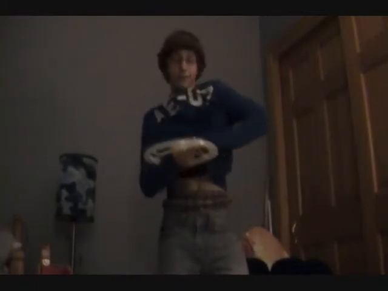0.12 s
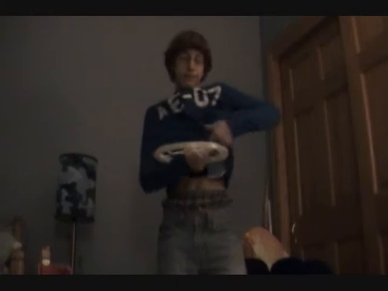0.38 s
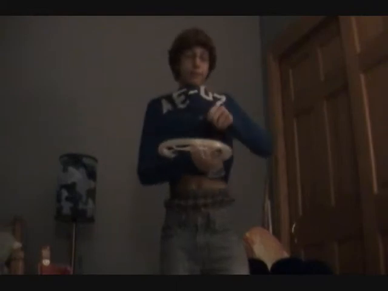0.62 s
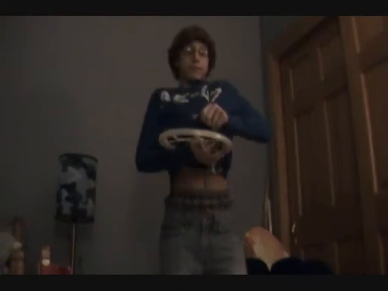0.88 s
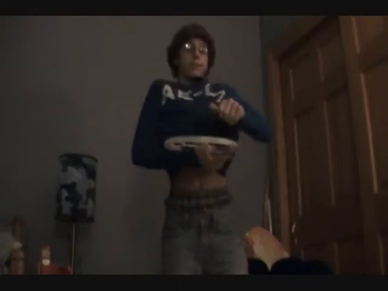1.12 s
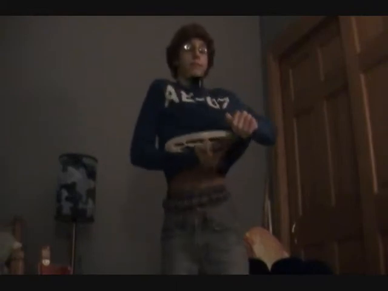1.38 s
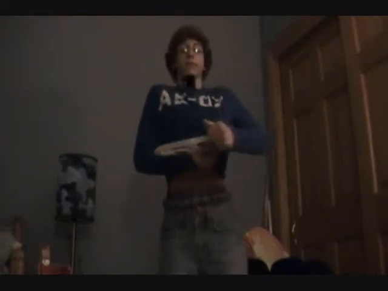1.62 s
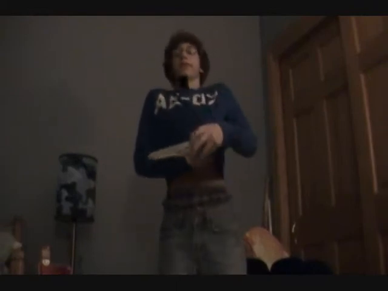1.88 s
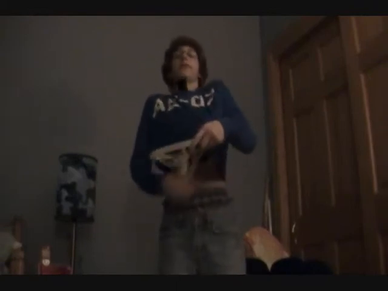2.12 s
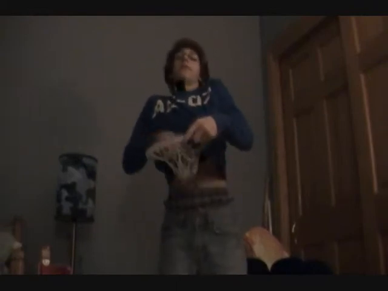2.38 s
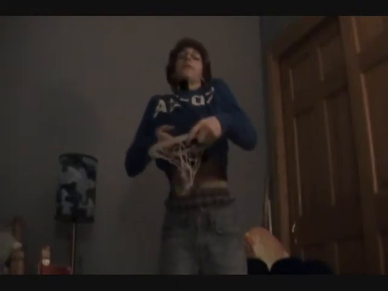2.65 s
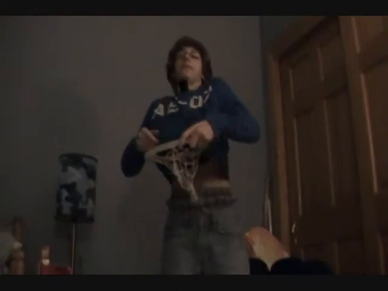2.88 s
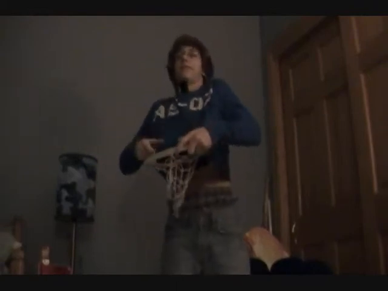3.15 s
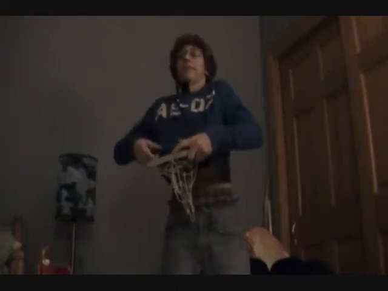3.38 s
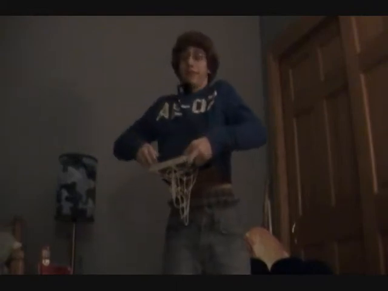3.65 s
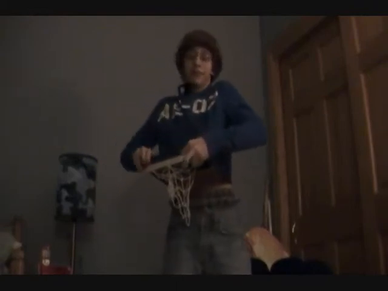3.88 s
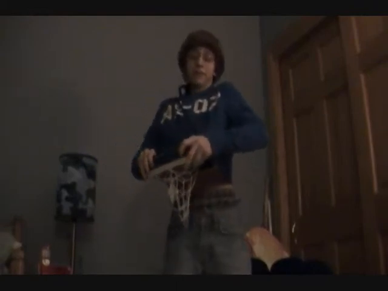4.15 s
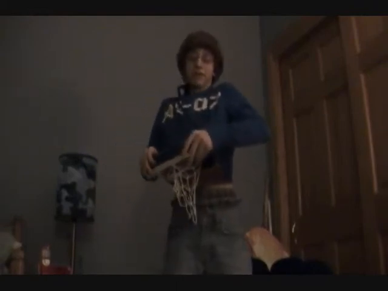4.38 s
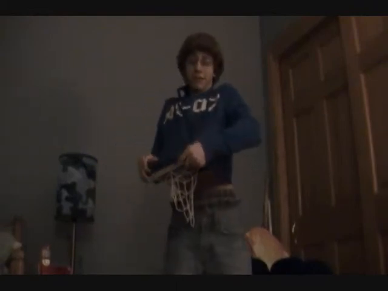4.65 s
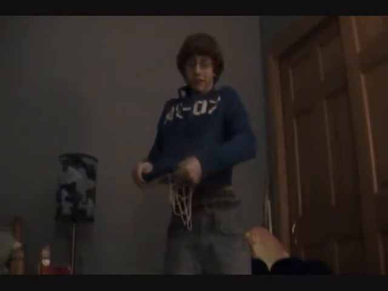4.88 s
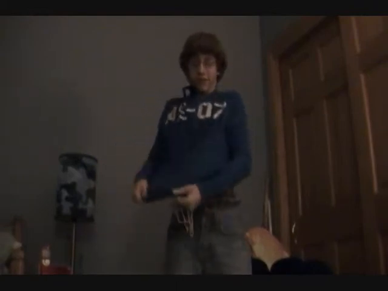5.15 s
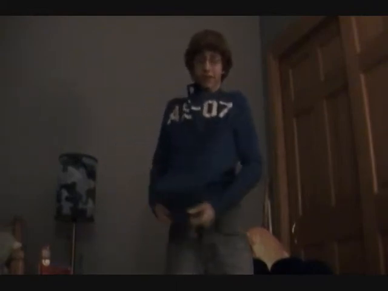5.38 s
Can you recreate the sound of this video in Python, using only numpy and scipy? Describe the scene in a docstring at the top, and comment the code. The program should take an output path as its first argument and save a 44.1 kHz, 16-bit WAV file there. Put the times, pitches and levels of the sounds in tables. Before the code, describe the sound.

In a small quiet bedroom, a sweater rustles continuously as a plastic hoop with a string net is handled beneath it. Early on come brushes and two short rubbing squeaks, then light ticks, a sharp plastic snap at about 3.5 seconds, soft low bumps, and a stronger cloth rustle near the end. Microphone a few steps away, with soft hiss.

```python
"""Toy hoop drawn from under a sweater

In a quiet, small bedroom a plastic hoop with a string net is pulled out from under knitted cloth.
Cloth friction is filtered random grains, skin on the hoop a stick-slip tone; knocks, brushes and ticks
are decaying resonances, and one catch snaps sharply. Direct sound, two echoes and a diffuse tail form the room.
Beneath lie shaped-noise hiss and murmur, a weak mains hum and, early on, a faint insect-like trill."""
import sys
import numpy as np
from scipy import signal
from scipy.fft import rfft, irfft, next_fast_len
from scipy.io import wavfile
from scipy.ndimage import uniform_filter1d

SR = 44100
rng = np.random.default_rng(int(sys.argv[2]) if len(sys.argv) > 2 else 0)


def log_audio(samples):
    """Write samples as a 16-bit WAV file to the path given in sys.argv[1]."""
    # one column per channel
    frames = np.atleast_2d(samples).T
    # limit to full scale, then quantise
    limited = np.clip(frames, -1, 1)
    pcm = np.round(limited * 32767).astype(np.int16)
    wavfile.write(sys.argv[1], SR, pcm)


def undo_db(level):
    """Turn decibels back into plain size, where 20 dB means ten times bigger."""
    steps = np.asarray(level, float) / 20
    return 10 ** steps


N = 243469
T = np.arange(N) / SR  # time of every sample, s


def colour(x, points, share=0.9):
    """Zero-phase filtering: the spectrum is scaled by `share` of the dB drawn through (Hz, dB) points."""
    size = next_fast_len(x.shape[-1])
    hz, db = np.transpose(points)
    f = np.maximum(np.arange(size // 2 + 1) * SR / size, 1)
    gain_db = share * np.interp(np.log(f), np.log(hz), db)
    return irfft(rfft(x, size) * undo_db(gain_db), size)[..., :x.shape[-1]]


def unit(x):
    """Normalisation: scale to an rms of 1."""
    return x / np.sqrt(np.mean(x ** 2))


def walk(rate):
    """Slow random modulation: levels held 1 / rate s and smoothed twice, with a spread near 1."""
    hold = int(SR / rate)
    steps = np.repeat(rng.standard_normal(N // hold + 1), hold)
    return 1.2 * uniform_filter1d(uniform_filter1d(steps, hold), hold)[:N]


def grit(per_s, spread_db):
    """Granular friction: tiny slips at random moments, a few much larger, in two unrelated streams."""
    size = np.minimum(rng.exponential(size=(2, N)), 5)
    slips = rng.random((2, N)) < per_s / SR
    return slips * rng.standard_normal((2, N)) * undo_db(spread_db * size)


def resonate(x, hz, width):
    """Two-pole resonance: a single mode of given centre and bandwidth."""
    b, a = signal.iirpeak(min(hz, .45 * SR), hz / width, fs=SR)
    return signal.lfilter(b, a, x)


def swell(t, rise, t60):
    """Attack and damping: a short rise, then an even decay in dB that falls 60 dB in t60 s."""
    return np.minimum(t / rise, 1) ** 2 * 1000 ** (-np.maximum(t - rise, 0) / t60)


def add(out, s, x):
    """Superposition: mix x into out from time s."""
    i = int(s * SR)
    out[..., i:i + x.shape[-1]] += x[..., :N - i]


# How hard the cloth rubs: start_s [s], level_db [dB rms of the fibre hiss, before variation and mixing]
RUBBING = [(0.0, -42.5), (.09, -53), (.2, -45.5), (.38, -41), (.47, -48), (.53, -48.5), (.61, -50.5),
           (.66, -44), (.83, -40.5), (.92, -43), (.98, -37), (1.08, -39), (1.14, -40.5), (1.19, -41),
           (1.3, -40), (1.5, -43.5), (1.66, -44.5), (1.78, -50), (1.9, -44.5), (1.98, -53), (2.022, -40),
           (2.055, -44.5), (2.165, -44), (2.2, -43.5), (2.27, -44), (2.34, -56), (2.41, -45.5), (2.55, -60),
           (2.68, -49.5), (2.74, -46), (2.83, -47), (2.95, -41.5), (3.1, -45), (3.27, -59.5), (3.35, -44.5),
           (3.46, -49.5), (3.72, -53), (3.77, -44), (3.83, -54), (3.98, -44), (4.24, -44), (4.33, -47.5),
           (4.5, -49.5), (4.7, -42.5), (4.8, -44), (4.9, -48), (5.0, -46), (5.04, -40.5), (5.12, -44.5),
           (5.22, -44), (5.31, -37), (5.36, -37.5), (5.43, -38.5), (5.47, -38.5), (5.52, -45.5)]
# How loose the cloth hangs: start_s [s], fold_db [dB rms], flap_db [dB rms], both at usual rubbing
SLACKNESS = [(0.0, -37.5, -45), (.25, -45, -48), (.5, -45.5, -59), (.85, -44, -53), (1.0, -41, -51),
             (1.15, -46, -59), (1.4, -44, -54.5), (1.7, -48, -51), (2.05, -46, -55), (2.4, -48.5, -57),
             (2.75, -46.5, -51), (3.1, -52, -49.5), (3.4, -43.5, -49.5), (3.8, -52, -47.5),
             (4.0, -54, -42.5), (4.2, -46, -59.5), (4.4, -50, -49), (4.7, -50.5, -59), (5.1, -46.5, -50.5),
             (5.52, -49.5, -46.5)]
# Spectra of the three layers: frequency_hz [Hz], level_db [relative dB per Hz, 0.9 of it applied]
FIBRE_SPECTRUM = [(1180, -18.5), (2000, -2), (2640, -3), (4790, -0.5), (6050, -1.5), (8580, -3),
                  (10600, -7.5), (11400, -21), (14800, -63), (22000, -120)]
FOLD_SPECTRUM = [(250, -16), (500, 5.5), (900, 6), (1500, 4.5), (2200, 3), (3500, -8.5)]
FLAP_SPECTRUM = [(25, -4.5), (45, -4.5), (100, -1.5), (200, 0), (400, 0.5), (700, -16.5)]
USUAL_RUBBING_DB = -45
FOLD_FOLLOW, FLAP_FOLLOW = 0.84, 0.93  # dB of swish and flap per dB of rubbing


def cloth():
    """Granular friction: fibres slip in dense grains, folds swish lower and patchier, loose cloth flaps the air."""
    hiss_db = np.interp(T, *np.transpose(RUBBING))
    s, *columns = np.transpose(SLACKNESS)
    fold_db, flap_db = (np.interp(T, s, column) for column in columns)
    harder_db = hiss_db - USUAL_RUBBING_DB
    # the grip varies for all layers at once
    grip_db = .9 * walk(30)
    hiss_db = hiss_db + 1.2 * walk(45)
    fold_db = fold_db + FOLD_FOLLOW * harder_db + 1.73 * walk(20)
    flap_db = flap_db + FLAP_FOLLOW * harder_db + 1.63 * walk(10)
    fibres = unit(colour(grit(15000, 0.56), FIBRE_SPECTRUM)) * undo_db(hiss_db)
    folds = unit(colour(grit(5000, 1.8), FOLD_SPECTRUM)) * undo_db(fold_db)
    flaps = unit(colour(rng.standard_normal((2, N)), FLAP_SPECTRUM)) * undo_db(flap_db)
    return undo_db(grip_db) * (fibres + folds + flaps)


# Sudden brushes against a part, and at 3.475 s the bright wash that follows the snap: start_s [s], # level_db
# [dB rms before decay and mixing], pitch_hz [Hz], width_hz [Hz, nominal: each of two resonances is 1.2 times as
# wide], t60_s [s]
BRUSH_EVENTS = [(.002, -34.5, 1130, 600, 0.19), (.125, -36, 2500, 900, 0.031),
                (0.163, -36.5, 725, 700, 0.4), (0.179, -38, 2170, 1200, 0.21), (.2, -41, 894, 500, 0.39),
                (.291, -33, 990, 900, 0.13), (.512, -43, 1870, 2000, 0.21), (.733, -31.5, 1030, 300, 0.05),
                (.93, -39, 2700, 1500, 0.054), (.985, -38, 1190, 1400, .25),
                (1.146, -30.5, 2100, 1210, .07), (1.582, -34.5, 4400, 5000, 0.075),
                (1.632, -38, 1230, 700, 0.1), (2.016, -35, 1870, 1300, 0.081),
                (2.155, -39, 1600, 1800, 0.17), (2.705, -34, 5600, 6300, 0.42),
                (2.728, -43, 2340, 200, .12), (2.865, -38.5, 5070, 6000, 0.11),
                (2.95, -40, 2500, 1500, 0.17), (3.062, -42.5, 870, 348, .19), (3.103, -41, 590, 600, 0.1),
                (3.348, -34.5, 900, 1300, 0.093), (3.36, -46.5, 680, 900, 1),
                (3.475, -30, 5200, 5000, 0.28), (3.545, -40, 1700, 900, 0.072),
                (3.756, -43, 586, 900, 0.15), (3.81, -42.5, 227, 298, 0.24), (3.966, -44, 384, 700, 0.36),
                (4.311, -42.5, 1870, 600, 0.2), (4.378, -37, 2500, 6000, 0.11), (4.38, -41, 398, 800, 0.17),
                (5.03, -36.5, 590, 700, 0.19), (5.07, -34, 1710, 250, 0.064), (5.098, -42, 1620, 250, 0.45),
                (5.134, -27.5, 3240, 5550, .23), (5.157, -29, 1650, 1300, 0.14),
                (5.16, -34.5, 700, 900, 0.19), (5.293, -45, 503, 700, 0.11),
                (5.369, -25.5, 4300, 5900, 0.12), (5.377, -24.5, 1680, 1410, 0.15),
                (5.467, -32.5, 1620, 700, 0.13)]
# Slow slides on a narrow ring, the lowest a mere rumble of the body:
# start_s [s], level_db [dB rms before decay and mixing], pitch_hz [Hz], t60_s [s]
SLIDE_EVENTS = [(0.371, -31.5, 9100, 0.14), (.53, -47, 2240, .2), (.96, -37.5, 990, 0.43),
                (.97, -45, 80, 0.82), (1.165, -42.5, 1970, .83), (1.3, -45, 1870, 1), (1.28, -40, 960, 0.3),
                (1.67, -44.5, 770, 0.33), (2.75, -46.5, 920, 1), (2.97, -46, 990, 0.74),
                (3.8, -51, 300, 0.24), (3.85, -45, 59.7, 0.29), (3.969, -46, 60, 0.24),
                (3.891, -46, 6200, 0.99), (3.9, -48.5, 1880, 0.61), (4.031, -48.5, 1590, .4),
                (4.419, -54, 50, 0.44), (4.74, -44.5, 1880, 0.4), (4.938, -48, 1674, 0.15),
                (5.15, -35.5, 1750, 0.16), (5.375, -33, 1810, 0.36)]
BRUSH_RISE_S, SLIDE_RISE_S = .0045, 0.02
SLIDE_WIDTH_HZ, SLIDE_WIDTH_SHARE = 49, 0.22  # nominal width: a base plus a share of the pitch


def brushes():
    """Forced resonance: gritty scrapes, sudden or sliding, each ring the part that is touched; one bright wash
    follows the snap."""
    out, t = np.zeros((2, N)), np.arange(SR // 2) / SR
    sudden = [(*row, BRUSH_RISE_S) for row in BRUSH_EVENTS]
    slow = [(s, db, hz, SLIDE_WIDTH_HZ + SLIDE_WIDTH_SHARE * hz, t60, SLIDE_RISE_S)
            for s, db, hz, t60 in SLIDE_EVENTS]
    for s, db, hz, width, t60, rise in sudden + slow:
        scrape = rng.standard_normal((2, len(t))) * undo_db(1.73 * rng.exponential(size=len(t)))
        ring = resonate(resonate(scrape, hz, 1.2 * width), hz, 1.2 * width)
        add(out, s, undo_db(db) * unit(ring) * swell(t, rise, t60))
    return out


# Skin dragging on the hoop, one list per stroke: start_s [s], pitch_hz [Hz], level_db [dB, near rms]
DRAG_STROKES = [
    [(0.66, 827, -60), (0.73, 832.5, -46.5), (0.914, 809, -59), (0.938, 815, -41.5), (0.994, 820, -50),
     (1.012, 848, -50), (1.054, 883, -56), (1.08, 850, -66.5)],
    [(1.24, 826, -50), (1.32, 856, -45), (1.358, 822, -45.5), (1.428, 799, -40), (1.492, 843, -66),
     (1.5, 831, -67.5)],
]


def drag():
    """Stick-slip: uneven friction excites one narrow hollow whose pitch moves with the grip."""
    out = np.zeros(N)
    for stroke in DRAG_STROKES:
        s, hz, db = np.transpose(stroke)
        wobble = unit(uniform_filter1d(rng.standard_normal((2, N)), int(0.012 * SR)))
        uneven = 0.87 + 0.76 * (wobble[0] + 1j * wobble[1])  # random strength and phase
        tone = np.exp(2j * np.pi * np.cumsum(np.interp(T, s, hz)) / SR)
        level_db = np.interp(T, s, db, left=-120, right=-120)
        out += np.real(uneven * tone) * undo_db(level_db)
    return out


# Soft knocks and cloth slaps on hollow parts: start_s [s], level_db [dB peak before rise and roughness],
# pitch_hz [Hz at the start], glide [octaves per s], t60_s [s]
KNOCK_EVENTS = [(.293, -29, 1087, 1, .047), (.733, -46, 1040, 14, 0.033), (1.26, -38, 520, 10, 0.031),
                (1.573, -37, 194, 0, 0.23), (2.169, -44, 90, 0.5, 0.26), (2.86, -37.5, 512, -5, 0.054),
                (3.348, -31, 670, -31, .012), (3.396, -38, 328, -9, 0.066), (3.756, -33.5, 495, -6.5, 0.14),
                (3.779, -39, 432, 4.5, 0.11), (3.805, -38, 326, -18.5, 0.15), (3.831, -35.5, 299, 2.5, .14),
                (3.871, -56, 152, -6, .2), (3.967, -36, 205, 9, 0.12), (4.056, -43, 110, 2, .17),
                (4.289, -46, 116, 6, 0.089), (4.381, -40, 255, -8, 0.052), (4.402, -37, 90, 2, 0.075),
                (5.035, -34, 290, 2, 0.028), (5.165, -29.5, 403, -5, 0.075), (5.469, -31.5, 355, 10, 0.095),
                (5.48, -35, 385, -1, 0.041), (5.505, -38, 380, -9, .1)]
KNOCK_RISE_S, KNOCK_RISE_CYCLES = 0.001, 1  # lower hollows take longer to speak
KNOCK_ROUGH = 0.43  # cloth in contact makes the ring uneven


def knocks():
    """Damped resonance: each knock rings one low hollow whose pitch may glide up or down."""
    out, t = np.zeros(N), np.arange(SR // 2) / SR
    for s, db, hz, glide, t60 in KNOCK_EVENTS:
        shape = swell(t, KNOCK_RISE_S + KNOCK_RISE_CYCLES / hz, t60)
        unevenness = unit(uniform_filter1d(rng.standard_normal(len(t)), int(SR / hz)))
        shape = shape * (1 + KNOCK_ROUGH * unevenness)
        cycles = np.cumsum(hz * 2 ** (glide * t)) / SR
        add(out, s, undo_db(db) * shape * np.sin(2 * np.pi * cycles))
    return out


# Hard ticks and the snap: start_s [s], level_db [dB peak before the band-pass in scene()], dullness [0-1]
TICK_EVENTS = [(0.2969, -17.5, 0.5), (0.5144, -28, 0.5), (0.7765, -29, 0), (1.0952, -27, .1),
               (1.1502, -36, .2), (1.26, -26, .1), (2.0178, -23, 1), (2.2584, -23, 0.29),
               (2.4160, -26, 0.2), (2.7006, -14, 0.44), (2.7076, -34, .1), (2.82, -22, 0),
               (3.352, -27, 0.6), (3.4695, -.6, 0), (3.4783, -4.5, 0), (3.547, -23, 0.87), (4.38, -23, 0.4),
               (5.3803, -7, .05)]
# Modes of the plastic: pitch_hz [Hz], level_db [relative dB before dulling and variation], t60_s [s]
PLASTIC_MODES = [(2100, -18.5, 0.02), (3740, -25, 0.0078), (4770, 1, 0.0083), (5720, 5.5, 0.0051),
                 (6980, 6, 0.0029), (7700, 2, 0.0054), (8300, -7, 0.013)]


def ticks():
    """Modal synthesis: each tick rings the plastic's short modes; a softer contact loses the upper ones."""
    out, t = np.zeros(N), np.arange(800) / SR
    for s, db, dull in TICK_EVENTS:
        # only ticks below -10 dB vary in timbre
        vary_db = 6.5 * rng.standard_normal(len(PLASTIC_MODES)) * (db < -10)
        ring = np.zeros(len(t))
        for (hz, mode_db, t60), vary in zip(PLASTIC_MODES, vary_db):
            dulling_db = 14.3 * dull * np.log2(hz / 3000)
            ring += undo_db(mode_db + vary - dulling_db) * np.sin(2 * np.pi * hz * t) * 1000 ** (-t / t60)
        add(out, s, undo_db(db) * ring / np.abs(ring).max())
    return out


# Unlikeness of the two microphone ports: frequency_hz [Hz], level_db [side minus mid dB, 0.9 of it applied]
PORT_SIDES = [(60, -10), (110, -19), (190, -9), (350, -13.5), (630, -13.5), (1140, -13), (2050, -9),
              (3690, -8.5), (6660, -7.5), (12000, -2.5)]


def ports(mid, other):
    """Partial coherence: left and right share a common part and take an unrelated part in opposite sign."""
    side = colour(other, PORT_SIDES)
    return np.array([mid + side, mid - side])


# Floor and far wall: delay_s [s], level_db [dB relative to the direct sound]
ROOM_ECHOES = [(.0058, -15), (.022, -22)]
# What the walls give back: frequency_hz [Hz], level_db [relative dB, 0.9 of it applied]
TAIL_SPECTRUM = [(300, -2.5), (1000, 1.5), (3000, 0.5), (7000, 1), (11000, -7)]
ROOM_T60_S = .26


def room(x, wet_db):
    """Impulse response: direct sound, two hard echoes and a diffuse tail that differs between the ports."""
    t = np.arange(int(.4 * SR)) / SR
    noise = colour(rng.standard_normal((2, len(t))), TAIL_SPECTRUM)
    common, other = noise * 1000 ** (-t / ROOM_T60_S) * np.minimum(t / 0.0087, 1)
    # wet_db is the energy of the common tail relative to the direct sound
    answer = undo_db(wet_db) * ports(common, undo_db(4) * other) / np.sqrt(np.sum(common ** 2))
    answer[:, 0] += 1
    for delay, db in ROOM_ECHOES:
        answer[:, int(delay * SR)] += undo_db(db)
    return signal.fftconvolve(x[None], answer, axes=1)[:, :N]


# Fading of the trill: start_s [s], level_db [dB peak before each throb varies]
TRILL_LEVEL = [(0, -49), (.3, -49), (.6, -49), (.95, -47), (1.2, -54), (1.4, -75)]
TRILL_HZ, THROBS_PER_S = 2900, 20.


def trill():
    """Amplitude modulation: a thin high tone throbs twenty times a second, some throbs weak."""
    beat = THROBS_PER_S * (T - .025)
    throb = np.maximum(np.sin(2 * np.pi * beat), 0) ** 4.2 * undo_db(2.0 * walk(19))
    level_db = np.interp(T, *np.transpose(TRILL_LEVEL))
    return undo_db(level_db) * throb * np.sin(2 * np.pi * TRILL_HZ * T)


# Hiss and room murmur: frequency_hz [Hz], level_db [relative dB per Hz, 0.9 of it applied]
HISS_SPECTRUM = [(15, -43), (25, -8.5), (129, 1.5), (180, -11), (300, -7.5), (419, -9.5), (452, -5),
                 (615, -11.5), (664, -14.5), (858, -7), (2000, -16.5), (2210, -15), (11400, -24),
                 (14800, -83), (22000, -120)]
# Mains hum: pitch_hz [Hz], level_db [dB rms before it wavers]
HUM_TONES = [(120, -68)]
HISS_DB = -52.5  # dB rms of the part common to both ports


def background():
    """Stationary noise: steady shaped hiss and murmur with a weak, wavering mains hum."""
    mid, other = undo_db(HISS_DB) * unit(colour(rng.standard_normal((2, N)), HISS_SPECTRUM))
    hum = np.zeros(N)
    for hz, db in HUM_TONES:
        hum += undo_db(db + 2.7 * walk(3.07)) * np.sqrt(2) * np.sin(2 * np.pi * hz * T)
    return ports(mid + hum, undo_db(4.5) * other)


def scene():
    """Direct-to-reverberant balance: ticks spread to every wall; cloth and knocks, muffled by the body, less."""
    mid, other = cloth() + brushes()
    soft = room(drag() + knocks() + undo_db(-1.5) * mid, wet_db=-18.5)
    soft = soft + ports(0, undo_db(-3.0) * other)  # cloth and brushes differ a little at each port
    # small parts radiate no bass
    band = signal.butter(3, [1400, 10200], "band", fs=SR, output="sos")
    hard = room(signal.sosfilt(band, ticks()), wet_db=-7)
    return hard + soft + trill() + background()


def band_limit(x):
    """A steep low-pass at the top of the band."""
    return signal.sosfilt(signal.butter(12, 12590, fs=SR, output="sos"), x)


# Balance of the ports: frequency_hz [Hz], level_db [left minus right dB]
PORT_LEAN = [(60, 0), (110, -2.5), (190, 0.5), (350, -1), (630, -0.5), (1140, -1), (2050, -0.5),
             (3690, 0.5), (6660, -2), (12000, -3)]
# Steep upper limit: frequency_hz [Hz], level_db [dB, 0.9 of it applied]
TOP_CUT = [(11230, 0), (11270, -10), (11310, -80)]


def record(dry):
    """Frequency response: the left port hears the treble a little weaker; the top is cut steeply."""
    # each port takes half of the difference
    left = colour(dry[0], PORT_LEAN, .5)
    right = colour(dry[1], PORT_LEAN, -.5)
    mix = colour(np.array([left, right]), TOP_CUT)
    return band_limit(mix)


dry = scene()
out = record(dry)
log_audio(out)
```